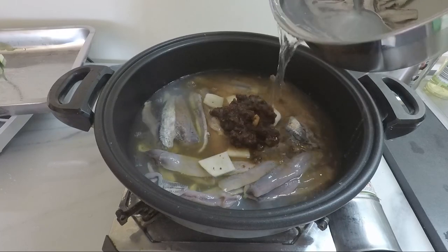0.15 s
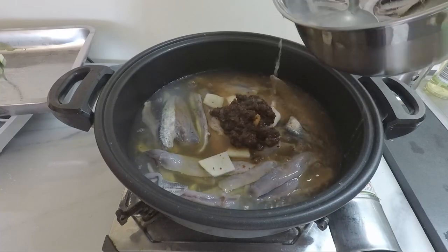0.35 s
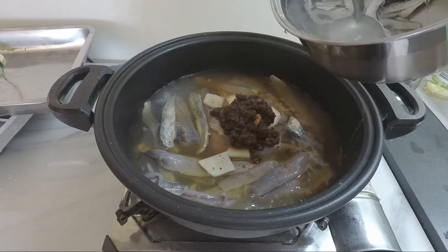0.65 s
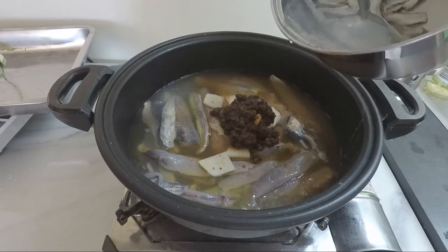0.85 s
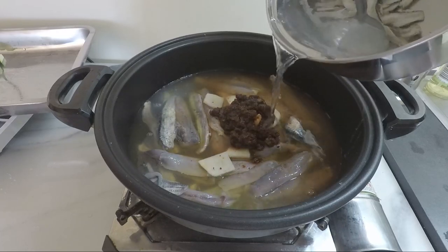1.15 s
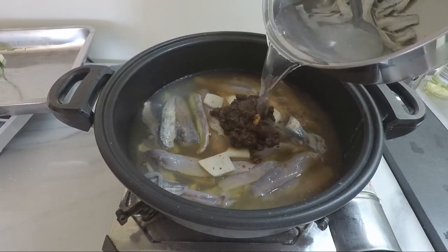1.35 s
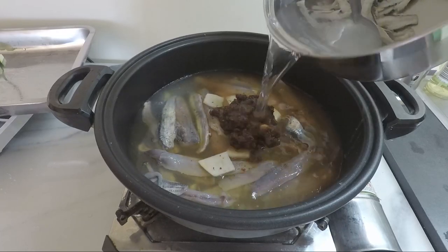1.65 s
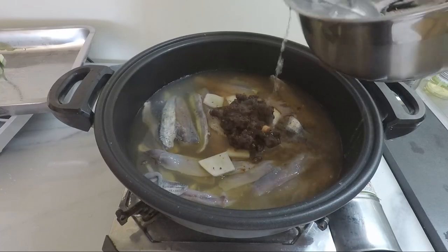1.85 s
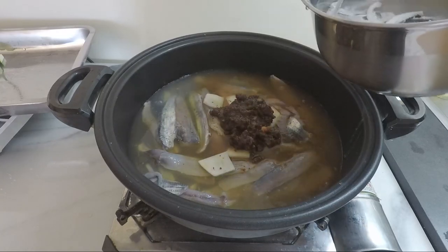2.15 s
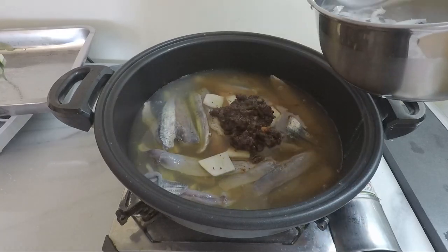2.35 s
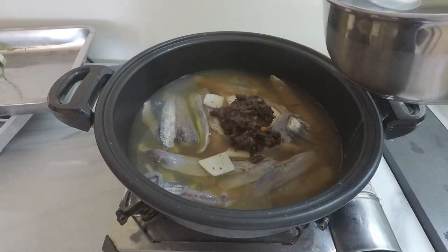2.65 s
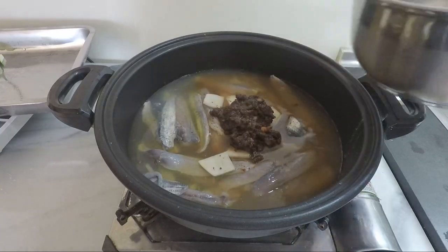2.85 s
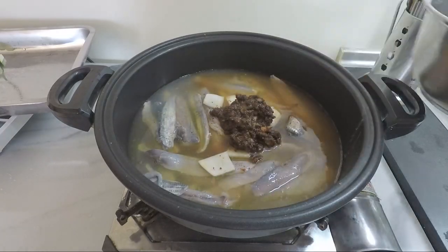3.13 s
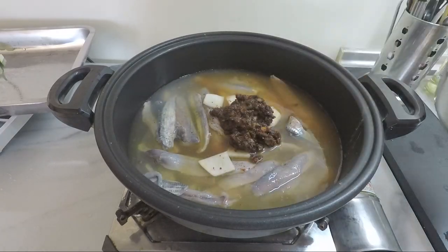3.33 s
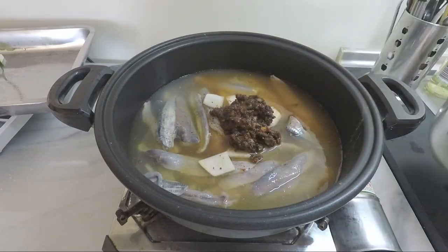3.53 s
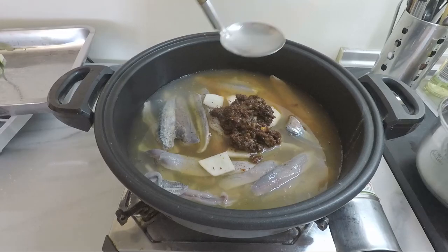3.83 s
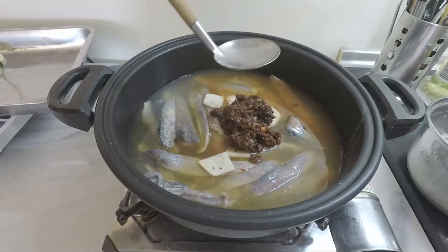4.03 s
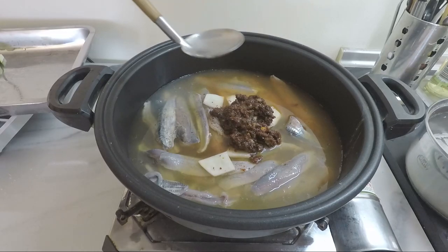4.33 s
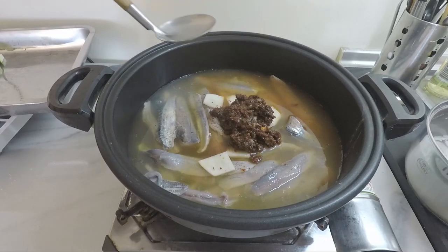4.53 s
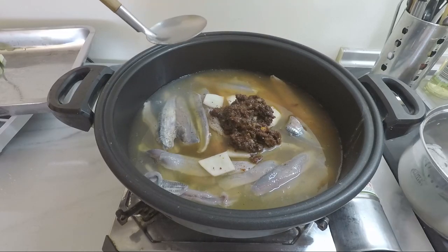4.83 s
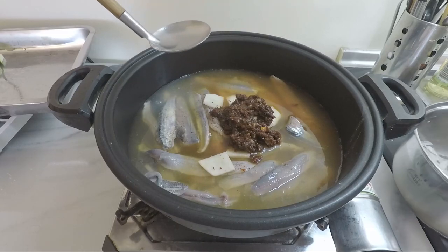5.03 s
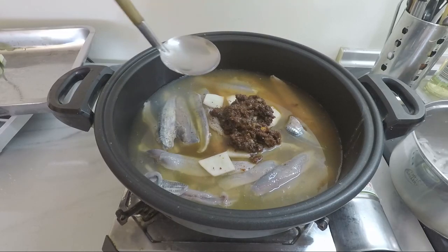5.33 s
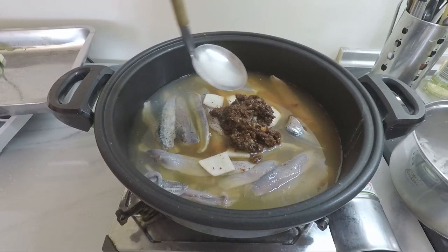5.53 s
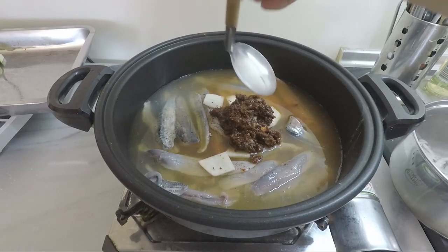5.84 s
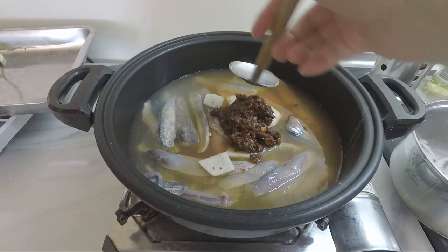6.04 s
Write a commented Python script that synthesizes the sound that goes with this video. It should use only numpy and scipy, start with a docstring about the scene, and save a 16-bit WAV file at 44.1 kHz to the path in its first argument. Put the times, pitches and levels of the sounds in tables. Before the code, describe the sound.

Bright bubbly trickles, twice, in a small kitchen with a droning machine; later hollow door-like bumps, faint rubbing and a final thud.

```python
"""Two pours into a stew pot, and a cupboard door

A thin stream runs twice from a steel pan into a full stew pot: ringing bubbles and noisy drops of water.
Then something like a cupboard door bumps, slides and thuds shut: contact clicks, damped modes, rubbing noise.
Wandering machine tones and coloured noise lie beneath; decaying noise gives a small, hard-walled kitchen."""
import sys
import numpy as np
from scipy import signal
from scipy.fft import rfft, irfft, next_fast_len
from scipy.io import wavfile
from scipy.ndimage import uniform_filter1d, minimum_filter1d, map_coordinates

SR = 44100
rng = np.random.default_rng(int(sys.argv[2]) if len(sys.argv) > 2 else 0)


def transcribe(signal):
    """Save signal, clipped to [-1, 1], as a 16-bit WAV file at the path in sys.argv[1]."""
    frames = np.atleast_2d(signal).T
    limited = np.clip(frames, -1, 1)
    pcm = np.round(limited * 32767).astype(np.int16)
    wavfile.write(sys.argv[1], SR, pcm)


N = 272538  # length in samples

# Tones of the machine hum: pitch_hz, level_db (rms), waver_db (per unit of wobble)
HUM_TONES = [(32.3, -36.5, 3.5), (139.4, -36.5, 4), (175.9, -40, -2.5), (240.4, -48.5, 4.5)]
# Thin motor tones: pitch_hz, level_db (rms)
WHINE_TONES = [(4720, -76), (8323, -79)]
# Swells of the low drone: centre_s, level_db, half_width_s
DRONE_SWELLS = [(.03, -19.5, 0.13), (.24, -24, .17), (2.92, -24.5, 0.13), (3.35, -25, 0.091),
                (4.38, -28, 0.15)]
# Slow level of the throb: time_s, gain_db
THROB_GAIN = [(0, 1.5), (.9, 0), (1.7, 1.5), (2.5, -2.5), (3.35, -2.5), (3.7, -9), (4.2, 0), (6.18, -2)]
# Spectrum of the moving air: frequency_hz, relative_level_db (per Hz)
AIR_SPECTRUM = [(60, -30), (200, -7), (310, 0.5), (400, -6.5), (540, -6), (800, -13.5), (1300, -18),
                (1900, -20.5), (2600, -26.5), (4700, -29), (6200, -33), (7400, -36.5), (10000, -38),
                (11500, -44.5), (14000, -48), (15200, -57)]
# Spectrum of the room's rumble: frequency_hz, relative_level_db (per Hz)
RUMBLE_SPECTRUM = [(12, -15.5), (28, 10.5), (45, 5.5), (70, 0), (92, 5), (125, 0), (190, -3.5),
                   (260, -12.5), (400, -28), (900, -100)]
# Reverberation of the kitchen: frequency_hz, t60_s
KITCHEN_DECAY = [(100, 0.47), (400, 0.78), (1500, 0.38), (5000, 0.35), (12000, 0.15)]

# Door contacts: start_s, click_db, knock_db, boom_db, treble_edge_hz, favoured_mode_hz
DOOR_KNOCKS = [(4.162, -24.5, -15.5, -11.5, 14000, 115), (4.310, -30.5, -19.5, -16.5, 14500, 190),
               (4.352, -38.5, -21, -17.5, 7000, 316), (5.178, -33.5, -19, -10, 4530, 278),
               (5.336, -62, -47, -20, 3000, 108)]
# Modes of the door panel: frequency_hz, relative_level_db, t60_s
PANEL_MODES = [(86.9, -6, 0.95), (100.1, 2, 0.42), (116.88, 0, 0.62), (153, -4, 0.75), (181.7, -13.5, 0.65),
               (227, -10.5, 0.29), (286, -13, 0.49), (357, -18, 0.38), (504, -15, 0.18), (594, -27, 0.25),
               (696, -46, 0.2), (825, -36.5, 0.39)]
# Sliding strokes of the door: fastest_s, level_db, half_width_s
DOOR_SLIDES = [(4.84, -50, 0.12), (5.17, -51, 0.1)]
# Spectrum of the panel's dense upper modes: frequency_hz, relative_level_db (per Hz)
WOOD_SPECTRUM = [(30, -47), (70, -25), (130, 8.5), (300, 7.5), (520, -6.5), (700, -8), (1100, -35),
                 (2000, -30.5), (5000, -38), (12000, -90)]
# Spectrum of the catch's click: frequency_hz, relative_level_db (per Hz)
CLICK_SPECTRUM = [(400, 5.5), (1000, 11.5), (2000, 4.5), (2650, -3), (3300, 3), (4450, -3.5), (4720, 5.5),
                  (5100, -6), (5850, -2), (6700, -7.5), (7500, -11.5), (10000, -11.5), (15000, -35)]
# Spectrum of sliding friction: frequency_hz, relative_level_db (per Hz)
RUB_SPECTRUM = [(200, -26), (700, 10), (1600, 0), (2500, -1), (4000, 2), (6300, -0.5), (7500, -8),
                (10000, -11), (15000, -32)]

# Pours: start_s, end_s, trickle_db (before a common gain in trickle() and room())
POUR_TIMES = [(0, 0.405, -53.5), (1.169, 1.87, -53.5)]
# The loudest bubbles: start_s, pitch_hz, level_db (before common gains in water())
LOUD_BUBBLES = [(.210, 2920, -34), (.384, 3760, -36.5), (1.188, 5370, -34.5), (1.251, 3130, -27.5),
                (1.382, 2530, -29), (1.441, 4890, -34.5), (1.475, 1850, -31.5), (1.559, 3770, -32.5),
                (1.584, 4560, -31), (1.585, 6850, -27.5), (1.795, 3260, -33), (1.815, 3440, -40),
                (1.919, 2580, -39)]
# The loudest drops slapping the stew: start_s, level_db (before a common gain in water())
LOUD_DROPS = [(.085, -36), (.388, -34), (.669, -42), (1.19, -46.5), (1.345, -35.5), (1.501, -37.5),
              (1.586, -44), (1.757, -39), (1.808, -35)]
# Spectrum of the trickle: frequency_hz, relative_level_db (per Hz)
TRICKLE_SPECTRUM = [(400, -40), (1200, -3), (2500, -6.5), (4200, -0.5), (6800, -4), (10000, -5.5),
                    (15000, -9.5)]
# Spectrum of the fine droplets: frequency_hz, relative_level_db (per Hz)
SPRAY_SPECTRUM = [(1500, -27), (4000, 1), (8000, 0), (13500, -2), (15200, -10)]
# Spectrum of a drop's slap: frequency_hz, relative_level_db (per Hz)
SLAP_SPECTRUM = [(500, -34), (1500, -3), (3500, 5), (14000, -10)]

MAINS_HZ = 60
THROB_HZ, THROB_CREST_S = 3.7, 1.03  # beat rate of the motor's octave with the mains buzz; its reference time
SHAFT_DB, OCTAVE_DB, BUZZ_DB = -33.5, -32.5, -33.5  # base rms levels, before wobbles, swells and THROB_GAIN

POUR_RISE_S, POUR_DRAIN_S = 0.05, 0.17  # time constants of the stream's start and of its last dribble
BUBBLE_T60_S, BUBBLE_REF_HZ = 0.022, 3000  # ring time at the reference pitch
BUBBLE_SHORTENS = 0.29  # power by which higher bubbles die sooner
FAINT_PER_S, FAINT_LOW_HZ, FAINT_HIGH_HZ = 26, 3070, 7170  # fainter bubbles during a pour and just after it
FAINT_DB, FAINT_SPREAD_DB = -45.5, 1.5  # mean and deviation, before common gains in water()
SPRAY_PER_S, SPRAY_DB, SPRAY_SPREAD_DB = 22, -57.5, 3
SPRAY_T60_S, SPRAY_LINGERS_S = 0.022, 0.2

CEILING_DB, LIMIT_HOLD_S = -4.5, 0.024  # the recorder's limiter
TOP_HZ = 15200  # the recorder's band limit


def amp(db):
    """Level: decibels become an amplitude ratio."""
    return 10 ** (np.asarray(db) / 20)


def unit(x):
    """Normalisation: the signal is scaled to rms 1."""
    return x / np.sqrt(np.mean(x ** 2) + 1e-20)


def seconds(size):
    """Sampling: sample numbers become times in seconds."""
    return np.arange(size) / SR


def along(points, hz):
    """Interpolation: (Hz, value) points are joined on a log-frequency axis."""
    f, v = np.transpose(points)
    return np.interp(np.log(hz + 1), np.log(f + 1), v)


def wobble(rate):
    """Slow modulation: a smooth curve through random knots, rate of them a second."""
    return map_coordinates(rng.standard_normal(400), [seconds(N) * rate], mode="wrap")


def filtered(x, response):
    """Linear filtering: the spectrum is multiplied by a function of frequency."""
    m = next_fast_len(len(x) + 8192)
    hz = np.fft.rfftfreq(m, 1 / SR)
    return irfft(rfft(x, m) * response(hz), m)[:len(x)]


def coloured(x, spectrum):
    """Spectral shaping: x is filtered by a dB curve and set to rms 1."""
    return unit(filtered(x, lambda hz: amp(along(spectrum, hz))))


def noise(spectrum, size):
    """Coloured noise: white noise is shaped by a spectrum, at rms 1."""
    return coloured(rng.standard_normal(size), spectrum)


def fade(t, t60):
    """Exponential damping: the level falls 60 dB in t60 seconds."""
    return np.exp(-np.log(1000) * t / t60)


def onset(t, rise_s):
    """Exponential attack: the gain approaches 1 with a time constant rise_s."""
    return 1 - np.exp(-t / rise_s)


def swell(s, db, width):
    """Gaussian envelope: gain rises and falls smoothly around time s."""
    return amp(db) * np.exp(-((seconds(N) - s) / width) ** 2)


def add(track, s, sound):
    """Superposition: a sound is summed into the track at time s."""
    part = track[max(round(s * SR), 0):][:len(sound)]
    part += sound[:len(part)]


def room(x, wet_db):
    """Reverberation: x is convolved with decaying noise whose decay time depends on frequency."""
    hz, t, z = signal.stft(rng.standard_normal(SR // 2), SR, nperseg=256)
    decay = fade(t, along(KITCHEN_DECAY, hz)[:, None])
    tail = signal.istft(z * decay, SR, nperseg=256)[1]
    tail *= onset(seconds(len(tail)), 0.0018)
    tail /= np.linalg.norm(tail)
    return x + amp(wet_db) * signal.fftconvolve(x, tail)[:N]


def tone(hz, drift, rate):
    """Phase modulation: a sine of rms 1 wanders by drift radians per unit of wobble."""
    phase = 2 * np.pi * (hz * seconds(N) + rng.random())
    return np.sqrt(2) * np.sin(phase + drift * wobble(rate))


def throb():
    """Beating: the motor's octave and the mains buzz drift in and out of step."""
    t = seconds(N) - THROB_CREST_S
    buzz = amp(BUZZ_DB) * np.sin(2 * np.pi * 2 * MAINS_HZ * t)
    octave_phase = 2 * np.pi * (2 * MAINS_HZ - THROB_HZ) * t + 0.48 * wobble(5)
    octave = amp(OCTAVE_DB + 1.2 * wobble(3.12)) * np.sin(octave_phase)
    level = amp(np.interp(seconds(N), *np.transpose(THROB_GAIN)))
    return np.sqrt(2) * (buzz + octave) * level


def hum():
    """Amplitude modulation: each hum tone wavers in level and phase."""
    total = np.zeros(N)
    for hz, db, waver in HUM_TONES:
        wavering = amp(waver * wobble(5.1)) * tone(hz, drift=0.98, rate=7)
        total += amp(db) * unit(wavering)
    return total


def machine():
    """Mixed tonal and broadband sources: unsteady motor tones over rumble and moving air."""
    drone = amp(SHAFT_DB + 2.8 * wobble(7)) + sum(swell(*row) for row in DRONE_SWELLS)
    shaft = drone * tone(hz=MAINS_HZ - THROB_HZ / 2, drift=0.8, rate=2.94)
    whine = sum(amp(db) * tone(hz, drift=1.0, rate=22) for hz, db in WHINE_TONES)
    rumble = amp(-27.5 + 0.59 * wobble(4.8)) * noise(RUMBLE_SPECTRUM, size=N)
    air = amp(-40 + 0.06 * wobble(5.8)) * noise(AIR_SPECTRUM, size=N)
    return shaft + throb() + hum() + whine + rumble + air


def ring(t, favoured_hz, boost_db):
    """Modal vibration: damped panel modes sum; the place of the blow favours some of them."""
    hz, db, t60 = np.transpose(PANEL_MODES)[..., None]
    octaves_away = np.log2(hz / favoured_hz)
    strength = amp(db + boost_db * np.exp(-(octaves_away / 0.31) ** 2))
    modes = np.sin(2 * np.pi * (hz * t + rng.random(hz.shape)))
    return np.sum(strength * fade(t, t60) * modes, axis=0)


def slide():
    """Sliding friction: rubbing noise swells with each stroke of the door."""
    return sum(swell(*row) for row in DOOR_SLIDES) * noise(RUB_SPECTRUM, size=N)


def door():
    """Impact excitation: the catch clicks, and 2 ms later the panel knocks and booms."""
    clicks, body, t = np.zeros(N), np.zeros(N), seconds(size=SR)
    for s, click_db, knock_db, boom_db, edge_hz, favoured_hz in DOOR_KNOCKS:
        crack = fade(t, 0.09) * noise(CLICK_SPECTRUM, size=len(t))
        soften = signal.butter(2, edge_hz, fs=SR)  # a softer contact loses its treble
        add(clicks, s, amp(click_db) * signal.lfilter(*soften, crack))
        knock = amp(knock_db) * fade(t, 0.41) * noise(WOOD_SPECTRUM, size=len(t))
        boom = amp(boom_db) * ring(t, favoured_hz, boost_db=5.5)
        add(body, s + 0.002, (knock + boom) * onset(t, 0.0019))
    return room(clicks, wet_db=-3) + room(body, wet_db=-11.5) + slide()


def flow():
    """Exponential growth and decay: each pour rises up to its start, holds and dribbles away."""
    t, gain = seconds(N), np.zeros(N)
    for start, end, db in POUR_TIMES:
        rise = np.minimum(t - start, 0) / POUR_RISE_S
        drain = np.maximum(t - end, 0) / POUR_DRAIN_S
        gain += amp(db) * np.exp(rise - drain)
    return gain


def scattered(rate, linger):
    """Jittered timing: chance events in and just after the pours: (s, share 0-1, normal deviate)."""
    rows = []
    for start, end, _ in POUR_TIMES:
        delay, share = rng.random(size=(2, 100))
        times = start + (np.arange(len(delay)) + delay) / rate
        events = zip(times, share, rng.standard_normal(len(delay)))
        rows += [row for row in events if row[0] < end + linger]
    return rows


def spray():
    """Impulsive noise: fine droplets tick on the surface as short decaying bursts."""
    strikes, t = np.zeros(N), seconds(size=2000)
    for s, _, size in scattered(SPRAY_PER_S, SPRAY_LINGERS_S):
        add(strikes, s, amp(SPRAY_DB + SPRAY_SPREAD_DB * size) * fade(t, SPRAY_T60_S))
    return strikes * noise(SPRAY_SPECTRUM, size=N)


def bubble(hz, t60, rise):
    """Bubble resonance: trapped air rings and climbs in pitch as it nears the surface."""
    t = seconds(size=2600)
    phase = 2 * np.pi * hz * (t + rise * t * t / (2 * t60))
    return np.sin(phase) * fade(t, t60) * onset(t, 0.00087)


def trickle():
    """Superposed resonances: the stream fizzes with many short-lived bubbles."""
    fizz = np.zeros(N)
    wet_s = POUR_TIMES[-1][1] + 4 * POUR_DRAIN_S
    for when, pitch, strength in rng.random(size=(2000, 3)):
        hz = 2200 * 6 ** pitch
        gain = amp(20 * strength) * np.sqrt(hz)
        add(fizz, when * wet_s, gain * bubble(hz, 14 / hz, rise=0.069))
    return amp(-10) * flow() * coloured(fizz, TRICKLE_SPECTRUM)


def faint_bubbles():
    """Random resonances: fainter bubbles spread evenly over log pitch, as rows (s, Hz, dB)."""
    rows = []
    for s, pitch, deviate in scattered(FAINT_PER_S, linger=0.1):
        hz = FAINT_LOW_HZ * (FAINT_HIGH_HZ / FAINT_LOW_HZ) ** pitch
        rows.append((s, hz, FAINT_DB + FAINT_SPREAD_DB * deviate))
    return rows


def water():
    """Bubble and impact radiation: bubbles plink and splash, and drops slap, over the fizz."""
    fizz, plinks, t = trickle() + spray(), np.zeros(N), seconds(size=2000)
    for s, db in LOUD_DROPS:
        slap = fade(t, 0.023) * onset(t, 0.0017) * noise(SLAP_SPECTRUM, size=len(t))
        add(fizz, s, amp(db - 6.0) * slap)
    for s, hz, db in list(LOUD_BUBBLES) + faint_bubbles():
        t60 = BUBBLE_T60_S * (BUBBLE_REF_HZ / hz) ** BUBBLE_SHORTENS
        add(plinks, s, amp(db - 1.0) * bubble(hz, t60, rise=0.058))
        # the surface tears as the bubble is trapped: noise centred on its pitch
        tear = [(hz / 3, -24), (hz * 0.86, -7), (hz, 0), (hz * 1.18, -10), (hz * 4, -42)]
        splash = fade(t, 0.034) * onset(t, 0.0011) * noise(tear, size=len(t))
        add(fizz, s, amp(db - 9) * splash)
    # the pot's wall keeps the plinks from the room
    return room(fizz, wet_db=-5.0) + room(plinks, wet_db=-14)


def scene():
    """Superposition: machine, door and water sum in one channel, heard from just above the pot."""
    return (machine() + door() + water())[None]


def limited(x):
    """Peak limiting: a held and smoothed gain ducks the loudest peaks."""
    hold = int(LIMIT_HOLD_S * SR)
    gain = np.minimum(1, amp(CEILING_DB) / (np.abs(x) + 1e-9))
    return x * uniform_filter1d(minimum_filter1d(gain, hold), hold)


def record(dry):
    """Band limiting: the recorder limits its peaks and keeps nothing from TOP_HZ upward."""
    return np.array([filtered(limited(x), lambda hz: hz < TOP_HZ) for x in dry])


dry = scene()
out = record(dry)
transcribe(out)
```